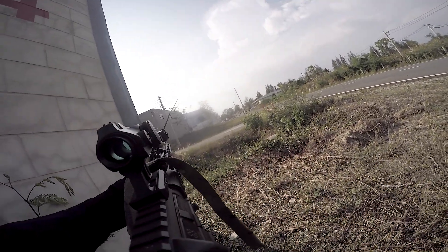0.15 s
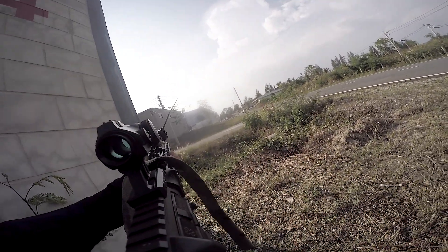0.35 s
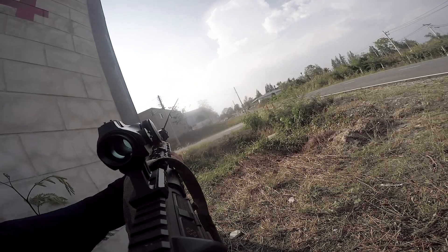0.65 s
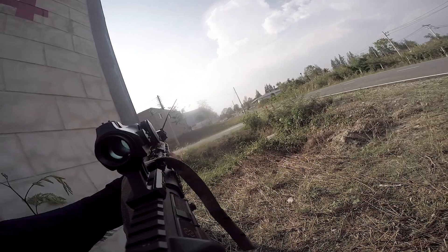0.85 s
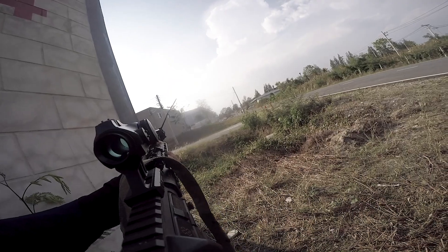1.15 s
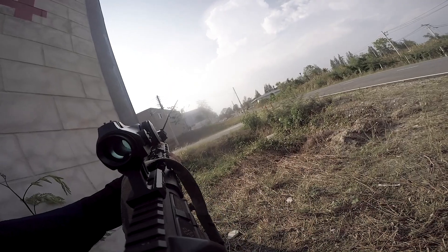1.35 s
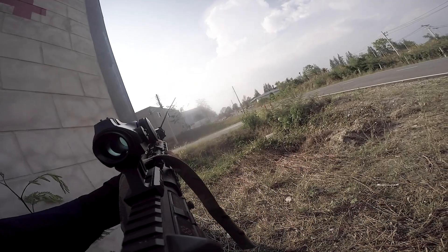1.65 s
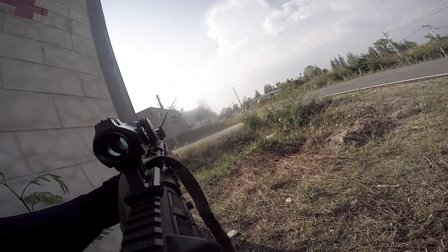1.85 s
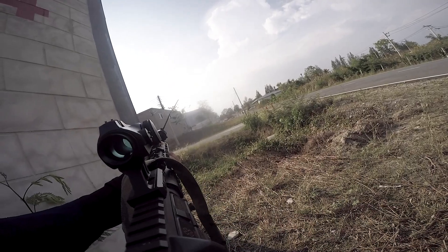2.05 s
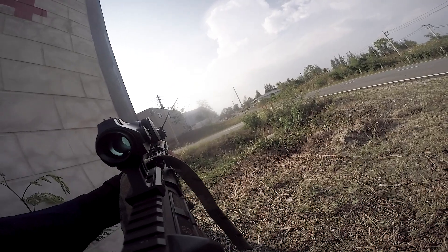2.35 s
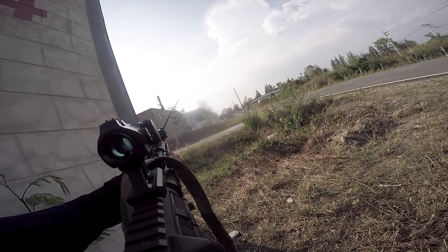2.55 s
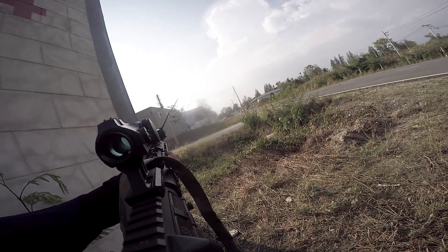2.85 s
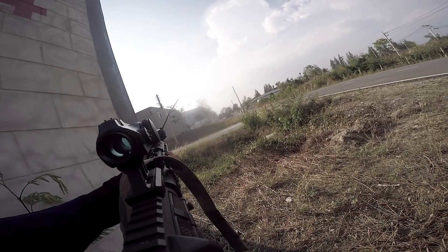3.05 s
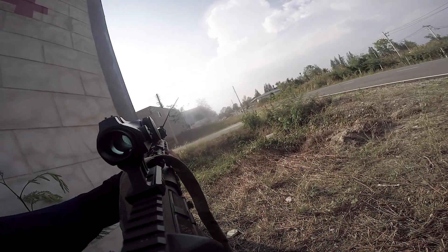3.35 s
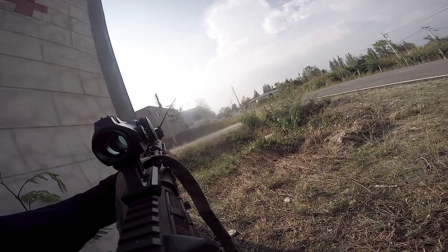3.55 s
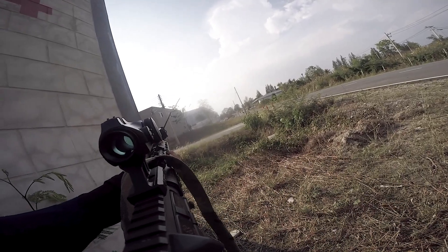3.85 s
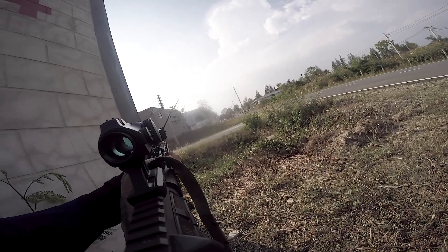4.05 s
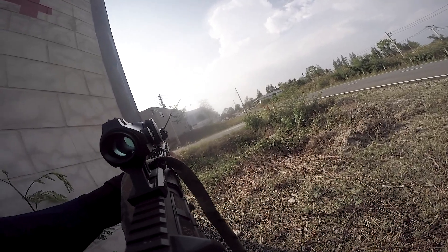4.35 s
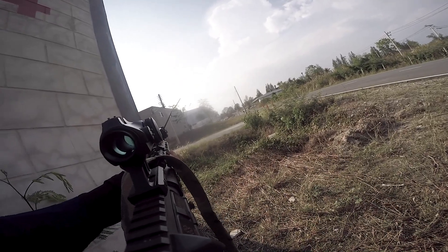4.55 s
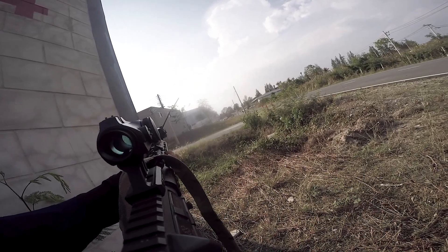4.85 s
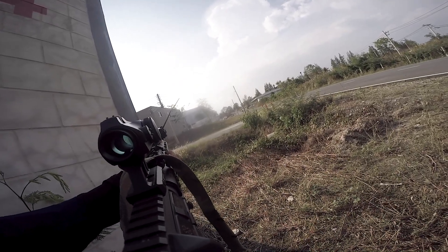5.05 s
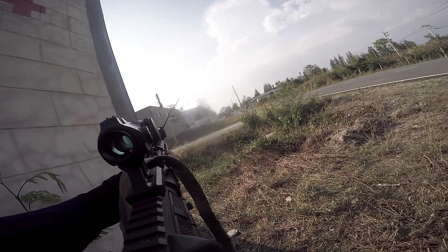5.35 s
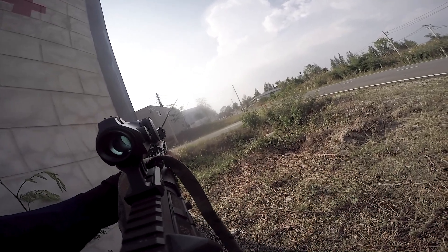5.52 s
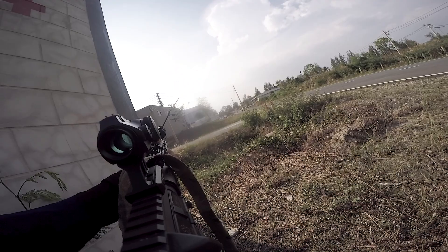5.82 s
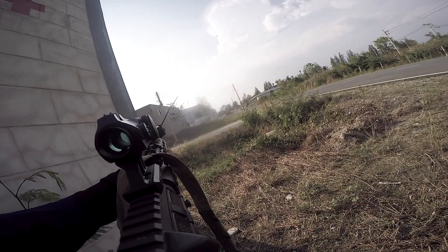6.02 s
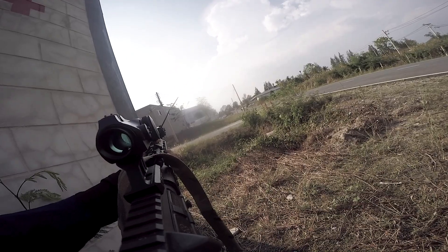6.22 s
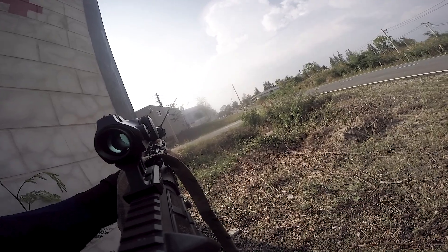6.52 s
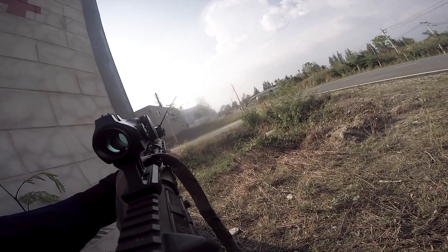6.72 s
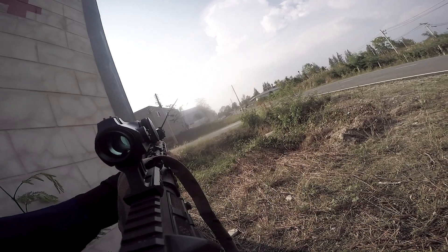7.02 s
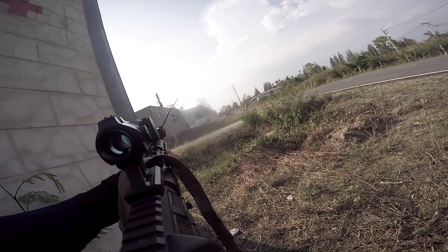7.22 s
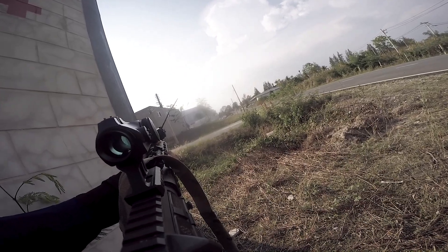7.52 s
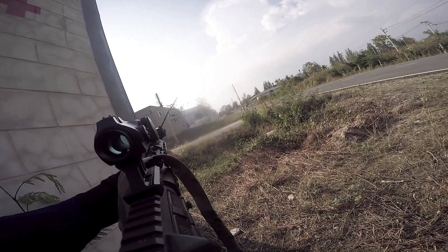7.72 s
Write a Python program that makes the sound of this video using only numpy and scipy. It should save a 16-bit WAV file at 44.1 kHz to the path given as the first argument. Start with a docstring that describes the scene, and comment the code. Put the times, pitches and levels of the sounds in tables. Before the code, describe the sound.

Close, hard mechanical airsoft shots snap in rapid semi-automatic succession with short motor whines and small pauses, over faint wind in an open field.

```python
"""An electric airsoft rifle fires single shots in quick strings, close to the camera microphone.
In each shot the motor spins up, the gears whine and grind, the action clacks and the piston slams home
with a puff of air: contact pulses, rattles and tooth tones drive the resonances of the gun.
It stands beside a wall in a field: filtered noise tails scatter each shot back.
Handling clicks fall in the pauses; shaped noise makes light wind and a distant outdoor hush."""
import sys
import numpy as np
from scipy import signal
from scipy.fft import rfft, irfft, next_fast_len
from scipy.io import wavfile
from scipy.ndimage import uniform_filter1d, map_coordinates

SR = 44100
rng = np.random.default_rng(int(sys.argv[2]) if len(sys.argv) > 2 else 0)


def wrap_up_sound(samples):
    """Save the sound to the file named by the first command line argument, as 16-bit audio."""
    columns = np.atleast_2d(samples).T
    # keep every value between -1 and 1, then stretch to whole-number steps
    tamed = np.clip(columns, -1, 1)
    steps = np.round(tamed * 32767).astype(np.int16)
    wavfile.write(sys.argv[1], SR, steps)


N = 347508


def amp(db):
    """Amplitude of a level in dB."""
    return 10 ** (np.asarray(db) / 20)


def unit(x):
    """x scaled to rms 1."""
    return x / np.sqrt(np.mean(x ** 2) + 1e-20)


def along(points, hz):
    """A (Hz, value) curve read on a log frequency axis."""
    f, value = np.transpose(points)
    return np.interp(np.log(hz + 1), np.log(f + 1), value)


def filtered(x, response):
    """x times a complex response of frequency."""
    m = next_fast_len(N + SR // 2)
    hz = np.fft.rfftfreq(m, 1 / SR)
    return irfft(rfft(x, m) * response(hz), m)[:N]


def noise(spectrum):
    """Coloured noise of rms 1."""
    white = rng.standard_normal(N)
    return unit(filtered(white, lambda hz: amp(along(spectrum, hz))))


def resonance(f, hz, width):
    """Causal response of one mode at hz, read at the frequencies f."""
    return 1j * f * width / (hz * hz - f * f + 1j * f * width)


def add(track, s, sound):
    """Mix a sound in at s seconds."""
    part = track[max(round(s * SR), 0):][:len(sound)]
    part += sound[:len(part)]


# wind rumble at the microphone, before trim and gusts: (t/s, level/dB)
WIND_LEVEL = [(0.0, -45.5), (0.35, -48), (0.46, -53), (1.54, -54.5), (1.71, -54), (2.63, -49),
              (3.07, -56.5), (4.56, -52.5), (4.85, -61.5), (5.66, -52), (6.65, -57.5), (7.88, -52.5)]
# colour of the wind, normalised to rms 1: (f/Hz, relative density/dB)
WIND_COLOUR = [(12, -13), (20, 5.5), (38, -2.5), (70, -5.5), (120, -15), (220, -25.5), (400, -41.5),
               (800, -43), (1500, -120)]
WIND_TRIM_DB, GUST_DB, GUSTS_PER_S = -1, 1.5, 1.7  # gusts: random swing about the level, points a second


def wind():
    """Light wind on the microphone: low noise whose level follows a slow course with random gusts."""
    t = np.arange(N) / SR
    level_db = np.interp(t, *np.transpose(WIND_LEVEL))
    gusts = map_coordinates(rng.standard_normal(N // 100), [t * GUSTS_PER_S])
    return amp(level_db + WIND_TRIM_DB + GUST_DB * gusts) * noise(WIND_COLOUR)


# colour of the distance, normalised to rms 1: (f/Hz, relative density/dB)
HUSH_COLOUR = [(40, -26), (120, -12), (250, -2), (400, -8), (800, -4), (1100, -10), (1600, -19.5),
               (3200, -24.5), (4500, -22.5), (6500, -29.5), (9000, -34.5), (13000, -36.5), (16000, -63.5)]
HUSH_DB = -69


def hush():
    """The steady hush of the distance: coloured noise."""
    return amp(HUSH_DB) * noise(HUSH_COLOUR)


FAR_S, FAR_LENGTH_S, FAR_HZ, FAR_SAG_HZ_PER_S, FAR_DB = 3.71, 0.12, 815, 60, -63


def far_tone():
    """One faint, far tone: a sine that swells, sags in pitch and fades."""
    age = np.clip(np.arange(N) / SR - FAR_S, 0, FAR_LENGTH_S)
    swell = np.sin(np.pi * age / FAR_LENGTH_S) ** 2
    phase = 2 * np.pi * np.cumsum(FAR_HZ - FAR_SAG_HZ_PER_S * age) / SR
    return amp(FAR_DB) * swell * np.sin(phase)


# trigger pulls, also played by every part of the gun's cycle below:
# (t/s, pull to slam/s, relative level of motor and action/dB, relative level of slam/dB)
SHOTS = [(0.2187, .0929, 1, 1.5), (0.422, 0.089, -4, -0.5), (0.6309, 0.089, -4, 0),
         (0.832, 0.091, -4.5, -0.5), (1.011, 0.09, -4.5, -0.5), (1.2118, 0.09, -3.5, -0.5),
         (1.4611, .092, -3.3, 0.5), (2.0898, .092, 0.5, -1), (2.436, .0932, -0.5, 1),
         (2.6465, .0909, -3.5, -1.5), (2.8403, 0.092, -2.5, 0.1), (3.1613, 0.093, -2.1, 1.4),
         (3.3475, 0.091, -4, 0.3), (3.518, 0.091, -4, 0.5), (3.895, .0926, -1.7, 2.3),
         (4.331, 0.092, -1, 0.5), (4.565, 0.093, -4, 0), (4.7659, 0.092, -4, -0.3), (4.9685, .0926, -5, -1),
         (5.2091, 0.093, -3.3, -0.5), (5.427, 0.092, -2.6, 1.5), (5.6535, 0.091, -2, 1.3),
         (5.8385, 0.093, -4, 1.5), (6.0245, 0.092, -4.5, -1.5), (6.363, .0923, -2.1, 1.5),
         (6.6206, 0.092, -3, -0.6), (6.8945, 0.091, -3, -0.8), (7.4423, .092, 0, -2)]
# how long the surroundings ring: (f/Hz, t60/s)
ECHO_DECAY = [(150, 0.093), (700, 0.22), (2800, 0.28), (6000, 0.3), (14000, .28)]
# how strongly the surroundings answer: (f/Hz, level/dB)
ECHO_COLOUR = [(150, -29.5), (700, -31.5), (1500, -18), (1900, -25), (2700, -15), (3400, -27.5),
               (4600, -18), (7000, -18), (12000, -7), (15000, -18)]


def surroundings(x, wall_delay=0.047, wall_spread=0.0067, wall_db=2):
    """Ground and masonry scatter each shot back as a noise tail, with a swell from the farther wall."""
    wet = np.zeros(N)
    edges = [0] + [int(shot[0] * SR) for shot in SHOTS[1:]] + [N]
    for start, end in zip(edges, edges[1:]):
        hz, t, grid = signal.stft(rng.standard_normal(SR // 2), SR, nperseg=256)
        swell_db = wall_db * np.exp(-((t - wall_delay) / wall_spread) ** 2)
        fade_db = -60 * t / along(ECHO_DECAY, hz)[:, None]
        tail = signal.istft(grid * amp(swell_db + fade_db), SR, nperseg=256)[1]
        tail /= np.linalg.norm(tail)
        add(wet, start / SR + 0.0053, signal.fftconvolve(x[start:end], tail))
    return filtered(wet, lambda hz: amp(along(ECHO_COLOUR, hz)))


PELLETS_S, PELLETS_RISE_S, PELLETS_DB, PELLETS_FADE_DB_PER_S = 1.765, .075, -69.5, 71.5


def pellets(hz=5200, width=900):
    """Loose pellets shift in the magazine once: sparse random grains through one resonance."""
    grains = rng.standard_normal(N) * (rng.random(N) < .05)
    rustle = unit(filtered(grains, lambda f: resonance(f, hz, width)))
    age = np.maximum(np.arange(N) / SR - PELLETS_S, 0)
    rise = np.minimum(age / PELLETS_RISE_S, 1)
    fade_db = PELLETS_FADE_DB_PER_S * np.maximum(age - PELLETS_RISE_S, 0)
    return rise * amp(PELLETS_DB - fade_db) * rustle


# the gun's resonances and how strongly each place drives them:
# (f/Hz, width/Hz, gears level/dB, action level/dB, cylinder head level/dB)
BODY = [(202, 360, -35.5, -7, -16), (294.4, 65, -28, -17, -8.5), (380, 290, -28, -23, -24),
        (470, 221, -9, -20.5, -23), (691, 131.4, 7.5, -4, 3.5), (793, 92, -9, 2, 0.5),
        (911.5, 109, -7, 1.5, 0.5), (1244, 510, -19, -23, -6), (1866, 220, -26.5, -8, -2),
        (2203, 420, -16.5, -10, -13), (2692, 257, -10.5, -14.5, -5.5), (3090, 140, -38.5, -17, -9),
        (3686, 282.5, -15, -9.5, -4.5), (4773, 426, -7, -12, -10.5), (4985, 267, -5.5, -8.5, -13),
        (7220, 1950, -19, -21, -50), (8350, 1530, -18, -21.5, -57.5), (15000, 2100, -34, -45, -46.5)]


def body(force, place):
    """The gun rings in its modes, of alternating sign, driven at the gears, the action or the head."""
    column = ["gears", "action", "head"].index(place)

    def response(f):
        return sum((-1) ** k * amp(levels[column]) * resonance(f, hz, width)
                   for k, (hz, width, *levels) in enumerate(BODY))
    return filtered(force, response)


def push(t, contact):
    """A force pulse of area 1: the longer the contact, the duller."""
    pulse = t * np.exp(-t / contact)
    return pulse / pulse.sum()


def rattle(t, decay, low_hz=1300, high_hz=10000):
    """Chatter of hard parts, of energy 1: chance timing, with the spectrum evened before fade and band."""
    fade = np.exp(-t / decay)
    onset = 1 - np.exp(-t / 0.00066)
    spectrum = rfft(rng.standard_normal(len(t)) * fade * onset)
    burst = irfft(spectrum / (np.abs(spectrum) + 1e-12), len(t)) * np.sqrt(fade)
    band = signal.butter(2, [low_hz, min(high_hz, .45 * SR)], "band", fs=SR, output="sos")
    burst = signal.sosfilt(band, burst)
    return burst / np.linalg.norm(burst)


# handling clicks: (t/s, knock force level/dB, tick level before colouring/dB)
CLICKS = [(1.773, -12, -31), (1.781, -18, -36), (2.811, -26, -33.5), (4.222, -34, -58.5), (4.289, -13, -38),
          (4.294, -10, -42)]
# colour of the ticks: (f/Hz, gain/dB)
TICK_COLOUR = [(590, -43), (1000, -8.5), (2110, -4.5), (2370, -10.5), (3250, -3), (5730, 14.5),
               (6340, -14.5), (6860, 2.5), (15000, -6.5)]


def handling():
    """Trigger and fittings click: short pushes ring the gun, coloured rattles tick."""
    knocks, ticks, t = np.zeros(N), np.zeros(N), np.arange(SR // 20) / SR
    for s, knock_db, tick_db in CLICKS:
        add(knocks, s, amp(knock_db) * push(t, 0.0002))
        add(ticks, s, amp(tick_db) * rattle(t, 0.0045))
    return body(knocks, "gears") + filtered(ticks, lambda hz: amp(along(TICK_COLOUR, hz)))


# the main spring and the barrel sing on after the slam:
# (f/Hz, mean level relative to the slam/dB, t60/s)
SPRING = [(1825, -71, 0.95), (2840, -71, .24), (3800, -65.5, .35), (4900, -64.5, 0.23)]


def spring():
    """Thin steel tones linger after each slam: decaying sines of slightly random level."""
    ring, t = np.zeros(N), np.arange(SR) / SR
    for s, cycle, _, slam_db in SHOTS:
        for hz, level, t60 in SPRING:
            fade = amp(level + slam_db + rng.normal(0, 2.5) - 60 * t / t60)
            add(ring, s + cycle, fade * np.sin(2 * np.pi * hz * t))
    return ring


# pull to slam at which the delays of puff and contacts are given: those delays scale with each shot's
# pace, the motor's times stay fixed
CYCLE_S = .092
# air and recoil reaching the microphone: (t after the pull/s, mean f/Hz, relative level/dB, time to peak/s)
PUFF = [(0.0791, 116.2, -16, 0.0048), (0.086, 57.9, -25, 0.0066)]


def puff():
    """The air shot and the recoil: a low swing of a cycle or two, first a suction, then a push."""
    air, t = np.zeros(N), np.arange(SR // 8) / SR
    for s, cycle, drive_db, _ in SHOTS:
        for after, hz, level, swell in PUFF:
            shape = (t / swell * np.exp(1 - t / swell)) ** 1.82
            swing = np.sin(2 * np.pi * hz * rng.normal(1, 0.036) * t)
            add(air, s + after * cycle / CYCLE_S, -amp(level + drive_db) * shape * swing)
    return air


# overtones of the gear teeth: (multiple of the tooth rate, relative level/dB)
TEETH = [(1, -8), (2, -11), (3, -11), (4, -12), (5, -13), (6, -11.5)]
# motor: tooth rate at full speed, time constant of the run-up, cut-off after the pull, coast to rest
TOOTH_HZ, SPIN_UP_S, CUT_OFF_S, COAST_S = 1177.7, .022, .096, .06
# levels at full speed, and the powers of speed by which they swell in the run-up and fade in the coast
WHINE_DB, GRIND_DB, WHINE_GROWS, GRIND_GROWS, COAST_FADES = -20.5, -16.5, 0.56, 1.32, 3.2
# strain as the gears pick up the piston: time after the pull, width, rise of whine and of grinding
PICKUP_S, PICKUP_WIDTH_S, PICKUP_WHINE_DB, PICKUP_GRIND_DB = 0.023, 0.0093, 12, 6.5
UNLOADED_DB, UNLOAD_S = -12, .0025  # without load the grinding drops: how far, time constant


def gears(waver=0.0063, start_waver=0.05, settle=0.037, bite=0.35, coast_waver=0.087, grind_hz=800):
    """The motor runs up through the gun's main resonance, strains at the piston, is cut off and coasts."""
    force, t = np.zeros(N), np.arange(int((CUT_OFF_S + COAST_S) * SR)) / SR
    idle = np.maximum(t - CUT_OFF_S, 0)
    run_up = 1 - np.exp(-t / SPIN_UP_S)
    coast = np.clip(1 - idle / COAST_S, 0, 1)
    tooth_hz = TOOTH_HZ * run_up * coast
    strain = np.exp(-((t - PICKUP_S) / PICKUP_WIDTH_S) ** 2)
    unloaded = 1 - np.exp(-idle / UNLOAD_S)
    fade = coast ** COAST_FADES
    whine_gain = fade * run_up ** WHINE_GROWS * amp(WHINE_DB + PICKUP_WHINE_DB * strain)
    grind_db = GRIND_DB + PICKUP_GRIND_DB * strain + UNLOADED_DB * unloaded
    grind_gain = fade * run_up ** GRIND_GROWS * amp(grind_db)
    play = waver + start_waver * np.exp(-t / settle)  # the gears judder until the load takes up their slack
    play = play + coast_waver * unloaded  # and again once the spring lets go
    thin = signal.butter(1, grind_hz, "high", fs=SR)  # scraping carries little bass
    for s, _, drive_db, _ in SHOTS:
        unsteady = unit(uniform_filter1d(rng.standard_normal(len(t)), size=90))
        speed = 1 + play * unsteady + rng.normal(0, 0.0055)
        phase = 2 * np.pi * np.cumsum(tooth_hz * speed) / SR
        whine = sum(amp(level) * np.sin(round(k) * phase) for k, level in TEETH)
        # each tooth scrapes as it meets the next
        scrape = rng.standard_normal(len(t)) * (1 + bite * np.cos(phase))
        grind = signal.lfilter(*thin, scrape)
        # the grinding follows the drive half as far in dB
        add(force, s, amp(drive_db) * whine_gain * whine + amp(.5 * drive_db) * grind_gain * grind)
    return body(force, "gears")


def blows(contacts, levels):
    """The force of one set of contacts, repeated in every shot at that shot's pace and level."""
    force, t = np.zeros(N), np.arange(SR // 30) / SR
    for (s, cycle, _, _), shot_db in zip(SHOTS, levels):
        for after, push_db, contact, rattle_db, decay in contacts:
            blow = amp(push_db + rng.normal(0, 0.85)) * push(t, contact)
            chatter = amp(rattle_db) * rattle(t, decay)
            add(force, s + after * cycle / CYCLE_S, amp(shot_db) * (blow + chatter))
    return force


# slack taken up in the gear train, then the piston drawn:
# (t after the pull/s, mean push level/dB, contact/s, rattle level/dB, rattle decay/s)
GEAR_KNOCKS = [(.001, -3, 0.00009, -12.5, 0.0012), (.0378, 16.5, 0.00018, -2.5, 0.0008)]


def gear_knocks():
    """Knocks in the gear train ring the gun at the gears."""
    return body(blows(GEAR_KNOCKS, [shot[2] for shot in SHOTS]), "gears")


# contacts of the action:
# (t after the pull/s, mean push level/dB, contact/s, rattle level/dB, rattle decay/s)
ACTION = [(.0455, -12.5, .0001, 1.5, 0.00045), (.0503, 25, 0.00015, 16, 0.00064),
          (.0545, 3, .0002, -1.5, 0.0011)]


def action():
    """The action clacks: its contacts ring the gun at the action."""
    return body(blows(ACTION, [shot[2] for shot in SHOTS]), "action")


# the piston lets go, knocks, then slams home with the last and hardest contact:
# (t after the pull/s, mean push level/dB, contact/s, rattle level/dB, rattle decay/s)
PISTON = [(0.0782, 7, 0.00093, -20.5, 0.0012), (0.0811, 28, 0.00047, -13.5, 0.0033),
          (.084, 10, 0.00011, -12.5, .002), (.0892, 14, .0002, 9, 0.0016), (0.092, 29, 0.00024, 11, 0.0011)]


def piston():
    """The piston lets go, knocks and slams home: its contacts ring the gun at the cylinder head."""
    return body(blows(PISTON, [shot[3] for shot in SHOTS]), "head")


def scene():
    """The rifle close by, its echo from ground and wall, and the outdoors behind."""
    outdoors = wind() + hush() + far_tone()
    rifle = gears() + gear_knocks() + action() + piston()
    gun = rifle + puff() + spring() + handling() + pellets()
    return (gun + surroundings(gun) + outdoors)[None]


CEILING, TOP_HZ = .3, 15700  # largest amplitude of the rounding, band limit


def record(dry):
    """The camera rounds off the highest peaks and keeps almost nothing above its band limit."""
    rounded = dry[0] / (1 + (dry[0] / CEILING) ** 6) ** (1 / 6)
    return filtered(rounded, lambda hz: 1 / (1 + (hz / TOP_HZ) ** 100))[None]


dry = scene()
out = record(dry)
wrap_up_sound(out)
```